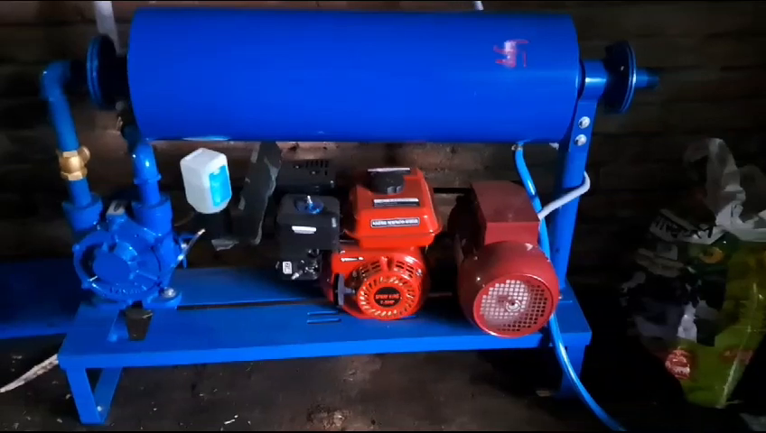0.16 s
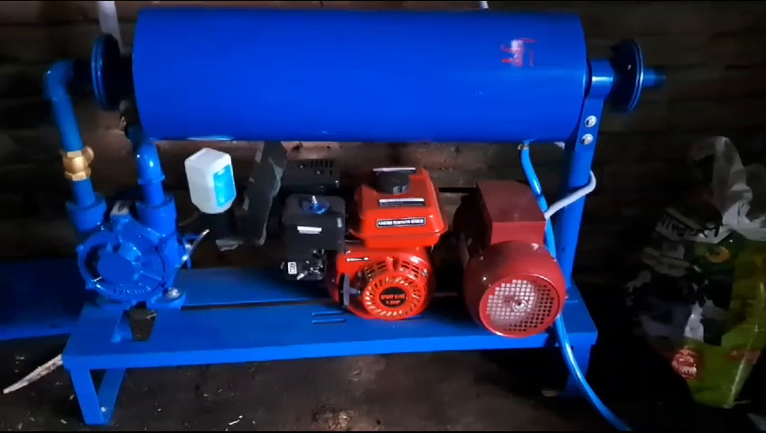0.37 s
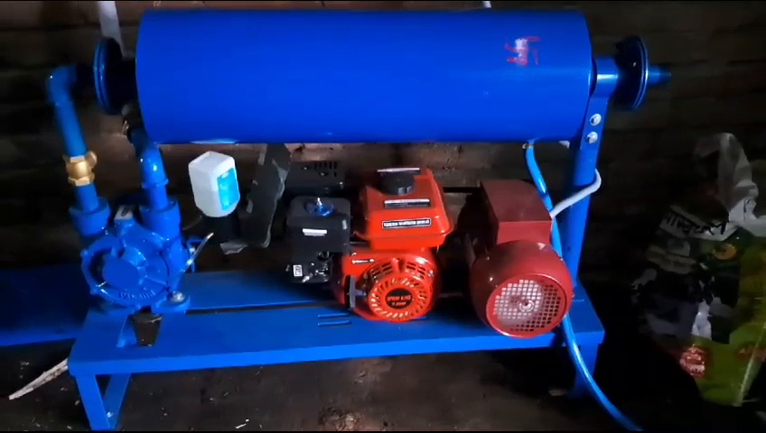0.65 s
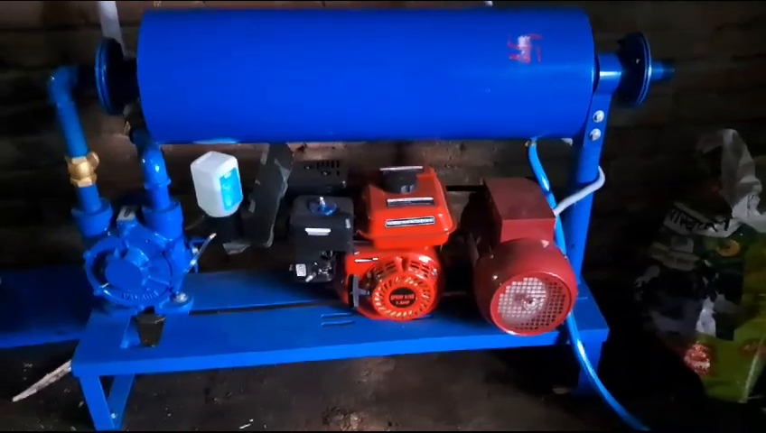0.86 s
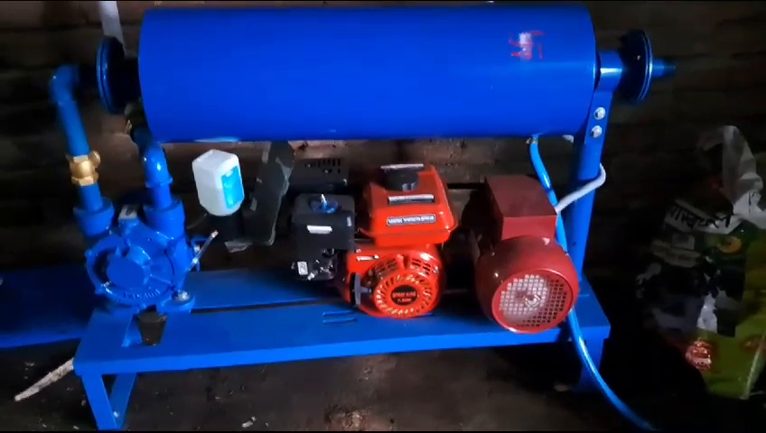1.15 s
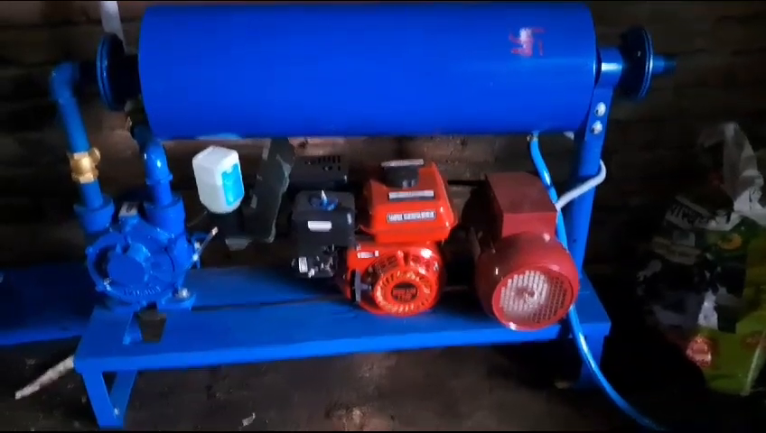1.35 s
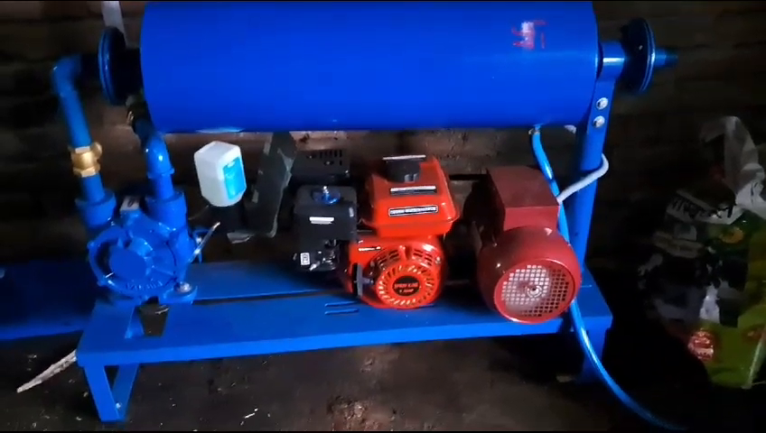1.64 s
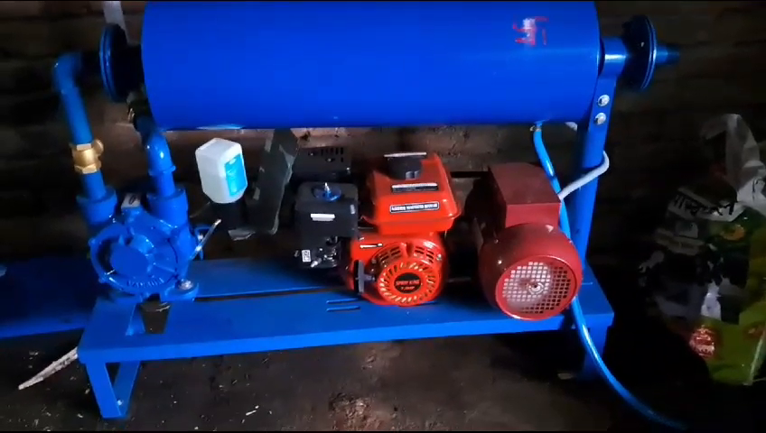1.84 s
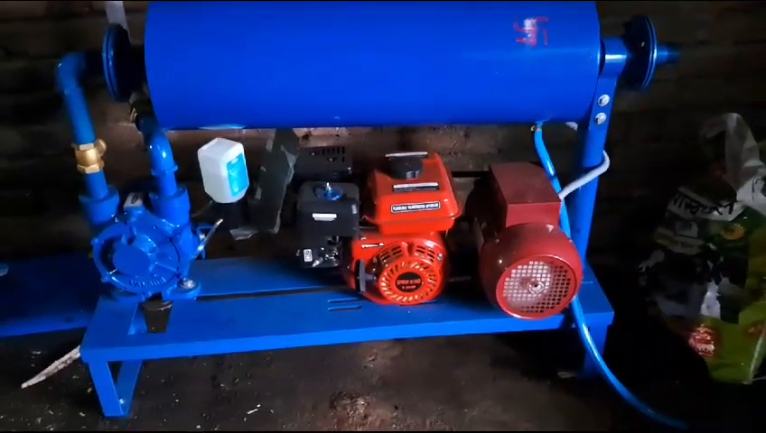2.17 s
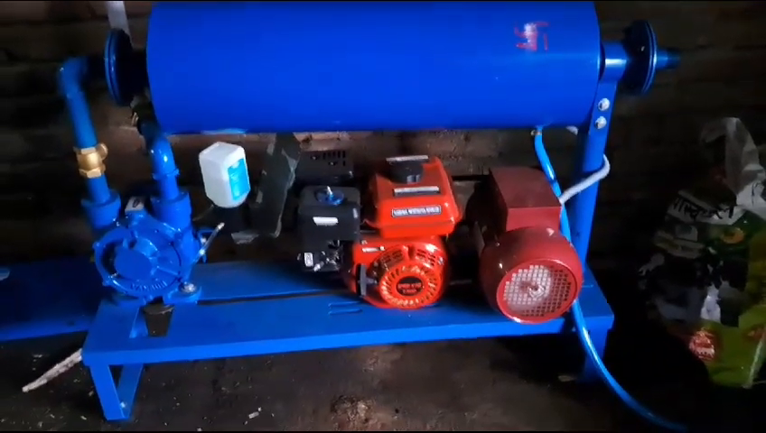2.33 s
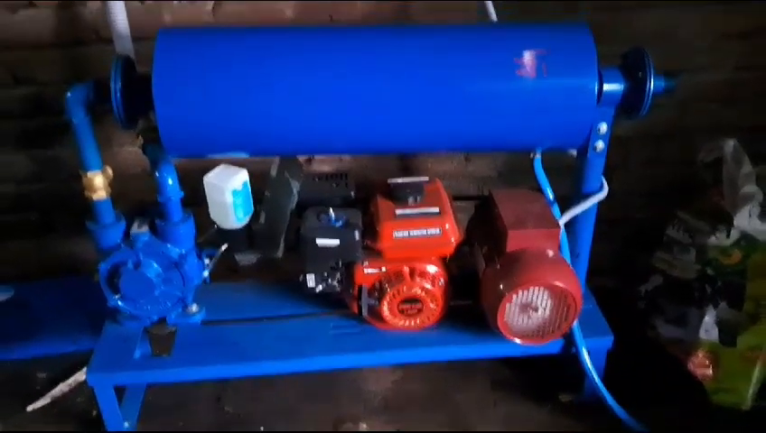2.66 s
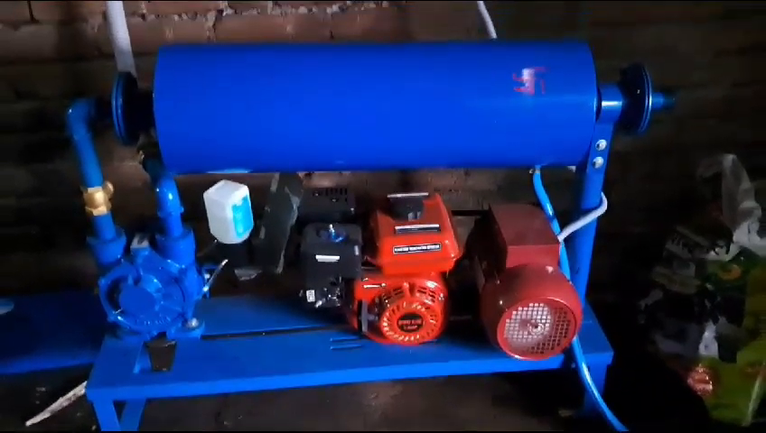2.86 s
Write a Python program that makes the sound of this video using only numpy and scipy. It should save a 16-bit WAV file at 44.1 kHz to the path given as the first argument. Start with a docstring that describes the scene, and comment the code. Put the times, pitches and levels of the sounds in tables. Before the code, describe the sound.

A motor-driven vacuum pump drones and clatters steadily, with hissing air, in a small room.

```python
"""In a small brick room, a belt-driven vacuum pump and its electric motor run steadily near a phone.
The pump's four vanes puff out a deep drone, and its rotor repeats the same clatter on every turn.
The motor hums, while air and bearings hiss and make the casing and pipes ring. The hiss and ringing
shift in level as the phone drifts. The sound cuts in abruptly after a short silence."""
import sys
import numpy as np
from scipy import signal
from scipy.fft import rfft, irfft
from scipy.io import wavfile
from scipy.ndimage import uniform_filter1d

SR = 44100
rng = np.random.default_rng(int(sys.argv[2]) if len(sys.argv) > 2 else 0)


def wav_record(signal):
    """Record a signal, one row per channel, as 16-bit PCM in the file named by sys.argv[1]."""
    frames = np.transpose(np.atleast_2d(signal))
    bounded = np.clip(frames, -1, 1)
    # unit amplitude maps onto the largest positive 16-bit level
    quanta = np.round(bounded * 32767).astype(np.int16)
    wavfile.write(sys.argv[1], SR, quanta)


N = 132300
SHAFT_HZ, VANES = 20.42004, 4

# In all tables, pan_db is how much louder the left side is, and lead_rad is how far its wave is ahead.
# Likeness runs from 0 (left and right unrelated) to 1 (the same).
# The tone colour of the rushing air: pitch_hz, base_db_per_hz, pan_db, likeness
AIR_COLOUR = [(25, -73, 0, .8), (50, -68, 0, .7), (90, -64.5, 0, 0.4), (159, -62.5, 7, .85),
              (210, -68.5, -3, 1), (262, -62.5, 1, 1), (362, -70, -4, 0.92), (605, -64, -1, 0.57),
              (850, -64, 5.5, 0.96), (1180, -62, 0, 0), (2000, -65.5, -0.5, 0.09), (2950, -65, 0.5, 0.01),
              (3700, -69.5, -2, 0), (4670, -67.5, -8, 0), (5400, -72, -9, 0), (6600, -70.5, -3.5, 0),
              (7400, -77.5, -1, 0.05), (8500, -90.5, -1, 0.1), (10300, -81.5, -2.5, 0), (13000, -77, -4, 0),
              (15800, -83, 3, .03)]
# Level changes as the phone drifts: time_s, middle_rings_db, high_rings_db, upper_rush_db
PHONE_DRIFT = [(0, 4.5, 0, 0.5), (.4, 4, 6, 0), (.8, 4, 4.5, -0.5), (1.1, 2, -4, 0), (1.5, 1, 1, -0.5),
               (1.7, 0.5, 1, -0.5), (1.9, 2, 4, 0), (2.3, 3, 2.5, -0.5), (2.6, 3, 5, 0),
               (2.85, -2, 1.5, 0.5), (3, -12, -9, 1.5)]


def undb(db):
    """Turn decibels into a gain to multiply by."""
    return 10 ** (np.asarray(db) / 20)


def waver(rate_hz):
    """A smooth random wobble of roughly plus or minus 1."""
    hold = int(SR / rate_hz)
    steps = np.repeat(rng.standard_normal(N // hold + 1), hold)
    return 1.7 * uniform_filter1d(uniform_filter1d(steps, hold), hold)[:N]


def tone(angle, db, pan_db, lead_rad):
    """A pure tone as it reaches the left and right microphones."""
    side = np.array([[.5], [-.5]])
    return np.sqrt(2) * undb(db + pan_db * side) * np.cos(angle + lead_rad * side)


def air_colour(hz):
    """The air's level, pan and likeness at the given pitches."""
    pitch_hz, *columns = np.array(AIR_COLOUR).T
    return [np.interp(np.log(hz), np.log(pitch_hz), column) for column in columns]


def vane_drone(turn):
    """Each vane pushes out a puff; the puffs blend into a deep note and its slightly late octave."""
    # The drone's two tones: multiple_of_vane_rate, level_db, pan_db, lead_rad
    puff_tones = [(1, -21.2, 1.3, -0.16), (2, -19, -.1, 0.039)]
    out, octave_lag_rad = 0, .29
    for multiple, db, pan_db, lead_rad in puff_tones:
        angle = 2 * np.pi * VANES * multiple * turn - (multiple - 1) * octave_lag_rad
        out += tone(angle, db + .3 * waver(3.26), pan_db, lead_rad)
    return out


def rotor_clatter(turn):
    """The rotor rattles the same way on every turn, so its tones are multiples of the shaft rate."""
    # The strong tones: multiple_of_shaft_rate, base_db, pan_db, lead_rad
    strong_tones = [(12, -49.4, -2, -0.2), (13, -49.1, -1, -0.0), (14, -51.4, -3, -0.1),
                    (15, -50.7, 0, -0.1), (19, -51.2, -6, 0.4), (24, -46.9, -1, 0.4), (25, -45.6, 0, 0.2),
                    (27, -46.3, -2, 0.5), (30, -45.8, 9, 0.4), (31, -50.7, 0, 0.4), (32, -47.7, -1, 0.0),
                    (34, -51.0, 2, 0.3), (36, -40.7, -5, 0.5), (40, -46.2, -3, -0.8), (43, -49.1, 2, 0.5),
                    (44, -38.0, 4, -0.0), (46, -35.8, 2, 0.3), (47, -59.9, 28, -0.6), (48, -44.2, 0, 0.9),
                    (49, -47.8, 2, 0.4), (52, -52.5, 7, -2.6), (54, -47.7, -6, -1.2), (56, -47.4, -3, 2.9),
                    (59, -50.2, -1, -2.5), (60, -46.2, 2, -1.8), (62, -50.9, -7, -0.3),
                    (64, -48.2, 10, 2.2), (66, -45.9, 3, 3.0), (68, -48.4, 3, -1.1), (72, -50.1, 12, 2.6),
                    (74, -46.9, -4, -0.9), (75, -44.1, 1, -0.2), (78, -45.5, 3, -1.6), (79, -50.8, 1, -1.0),
                    (81, -61.2, -30, -1.7), (84, -49.6, -8, 1.0), (86, -50.6, -9, 2.9),
                    (96, -49.2, -1, 1.5), (100, -51.0, 0, 0.3), (104, -54.0, -12, 1.0),
                    (110, -45.2, -1, 0.4), (114, -49.6, -1, -2.2), (124, -49.0, -8, 1.4),
                    (129, -52.4, -8, 0.3), (131, -50.0, 0, 0.3), (133, -52.7, 7, -2.7),
                    (138, -51.1, 7, -1.9), (142, -49.5, 9, 2.4), (146, -53.0, -9, -2.3),
                    (159, -53.5, -13, 0.6), (201, -51.5, -5, -2.0), (220, -52.5, -9, 1.2)]
    # The average level of each of the many weak tones: pitch_hz, base_db
    weak_levels = [(100, -53), (400, -56), (900, -56), (1600, -49), (2000, -56), (2800, -52.5), (3500, -56),
                   (4300, -56), (5200, -59), (6500, -58)]
    buzz_db = 1.5 * (np.arange(N) / SR - 1.5)  # grows by 1.5 dB a second
    strong = 0
    for multiple, db, pan_db, lead_rad in strong_tones:
        in_buzz = 2000 < multiple * SHAFT_HZ < 3200
        angle = 2 * np.pi * multiple * turn + rng.uniform(0, 2 * np.pi)
        strong += tone(angle, db + waver(5.12) + buzz_db * in_buzz, pan_db, lead_rad)

    # Build one turn of weak tones at random levels, then repeat it.
    size = 8192
    multiples = np.arange(size // 2 + 1)
    hz = np.maximum(multiples, 1) * SHAFT_HZ
    pitch_hz, base_db = np.array(weak_levels).T
    db = np.interp(np.log(hz), np.log(pitch_hz), base_db, left=-200, right=-200)
    db -= 5.5 * (multiples % 2)  # odd multiples are weaker
    db[[int(row[0]) for row in strong_tones] + [VANES, 2 * VANES]] = -200  # these already sound
    _, _, likeness = air_colour(hz)
    middle, side = rng.standard_normal((2, len(hz))) + 1j * rng.standard_normal((2, len(hz)))
    weak = []
    for sign in (1, -1):  # left, right
        spectrum = np.sqrt(1 + likeness) * middle + sign * np.sqrt(1 - likeness) * side
        one_turn = irfft(undb(db) * spectrum, size) * size / np.sqrt(8)
        weak.append(np.interp(turn % 1 * size, np.arange(size), one_turn, period=size))
    return strong + np.array(weak)


def motor_hum(t):
    """Mains power makes the motor hum; the belt and motor shaft add tones of their own."""
    # The hum, belt and shaft tones: pitch_hz, level_db, pan_db, lead_rad
    hum_tones = [(100.6, -40, 2, -0.74), (199, -44.5, -2, 0.077), (299.4, -55, -9, -.2),
                 (159, -56, -1, -.1), (165.6, -43, 1.5, -0.44), (225, -50, 0, -.1), (251.5, -51.5, 5, -.1),
                 (263.1, -47, -6, 0), (281, -51.5, -2, 0), (930.4, -47.3, 2.5, .2)]
    out = 0
    for hz, db, pan_db, lead_rad in hum_tones:
        angle = 2 * np.pi * hz * t + rng.uniform(0, 2 * np.pi)
        out += tone(angle, db + .46 * waver(2.2), pan_db, lead_rad)
    return out


def room_echo(fade_s=.28):
    """The spectra of two echoes off the brick walls, each dying away by 60 dB in fade_s."""
    tail = rng.standard_normal((2, N)) * undb(-60 * np.arange(N) / SR / fade_s)
    return rfft(tail / np.sqrt(np.sum(tail ** 2, axis=1, keepdims=True)))


def hiss(shape, pan_db, likeness, echo, room_share=.4):
    """Stereo noise with a shaped spectrum; part comes from one spot and is coloured by the room."""
    noise = rfft(rng.standard_normal((3, N)))
    middle, side = np.sqrt(1 - room_share) * noise[:2] + np.sqrt(room_share) * echo * noise[2]
    sign = np.array([[1], [-1]])
    spectrum = np.sqrt(1 + likeness) * middle + sign * np.sqrt(1 - likeness) * side
    return irfft(shape * undb(pan_db * sign / 2) * spectrum, N) / np.sqrt(2)


def air_rush(hz, echo, upper_rush_db):
    """Rushing air makes a broad hiss, in half-octave bands that each flicker on their own."""
    db, pan_db, likeness = air_colour(hz)
    shape = undb(db) * np.sqrt(SR / 2)
    out = 0
    for step in range(21):
        band = np.cos(np.pi / 2 * np.clip(2 * np.log2(hz / 20) - step, -1, 1))
        drift_db = upper_rush_db * (step > 10)  # bands from about 900 Hz up
        out += undb(drift_db + .77 * waver(9)) * hiss(band * shape, pan_db, likeness, echo)
    return out


def casing_rings(hz, echo, turn, middle_rings_db, high_rings_db):
    """Air makes the casing and pipes ring at their own pitches; the highest pulse three times a turn."""
    # The pitches at which they ring: pitch_hz, width_hz, base_db, pan_db, likeness
    rings = [(497, 22, -44, 0, .9), (550, 10, -49, 0, .8), (948, 64, -36.8, 2, .9), (1105, 16, -48, -2, .3),
             (1440, 14, -49, 1, .4), (1550, 70, -47, 2, .4), (2270, 50, -49, -2, .3),
             (3591, 20, -52, -2, .2), (3515, 20, -53, -2, .2), (4140, 70, -47, -3, .2),
             (4335, 60, -42, -3, .2), (4402, 24, -43.5, -3, .3), (4480, 80, -44, -4, .2),
             (4990, 50, -47, -3, .2), (4870, 70, -51, -3, .2), (5075, 60, -50, -3, .2),
             (5140, 50, -50, -3, .2), (3010, 60, -49, 0, .2), (4600, 70, -47, -4, .2),
             (5808, 56, -43.3, -6, .2), (5882, 26, -47.5, -6, .3), (5955, 40, -54, -5, .2),
             (5700, 120, -51, -5, .2), (6365, 60, -52, -3, .2)]
    pulsing_db = high_rings_db + 2 * np.cos(2 * np.pi * 3 * (turn - .56))
    out = 0
    for pitch_hz, width_hz, db, pan_db, likeness in rings:
        peak = 1 / (1 + ((hz - pitch_hz) / (width_hz * .73)) ** 2)
        peak /= np.sqrt(np.mean(peak ** 2))
        change_db = pulsing_db if pitch_hz > 5500 else middle_rings_db if pitch_hz > 4000 else 0
        out += undb(db + change_db + .6 * waver(4.03)) * hiss(peak, pan_db, likeness, echo)
    return out


def rotor_throb(turn, loudest_at_turn=.897):
    """A gain that makes the hiss swell a little with every turn and with every vane."""
    angle = 2 * np.pi * (turn - loudest_at_turn)
    return undb(.74 * np.cos(angle) + .5 * np.cos(VANES * angle))


def scene():
    """Drone, clatter, hum and throbbing hiss all sound together."""
    t = np.arange(N) / SR
    turn = SHAFT_HZ * (t - .01109)  # counts the rotor's turns
    machine = vane_drone(turn) + rotor_clatter(turn) + motor_hum(t)
    hz = np.arange(N // 2 + 1) * SR / N + 1e-3  # the pitches in a spectrum, kept above zero
    time_s, *drifts = np.array(PHONE_DRIFT).T
    middle_rings_db, high_rings_db, upper_rush_db = (np.interp(t, time_s, db) for db in drifts)
    echo = room_echo()
    rush = air_rush(hz, echo, upper_rush_db)
    ringing = casing_rings(hz, echo, turn, middle_rings_db, high_rings_db)
    return machine + (rush + ringing) * rotor_throb(turn)


def record(dry, opens_s=.0694, top_hz=15750):
    """The microphone switches on abruptly, and the very highest treble is cut."""
    is_on = np.arange(N) / SR > opens_s
    treble_cut = signal.ellip(16, .2, 80, top_hz, fs=SR, output="sos")
    return signal.sosfilt(treble_cut, dry * is_on)


dry = scene()
out = record(dry)
wav_record(out)
```